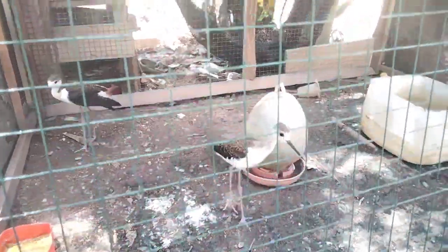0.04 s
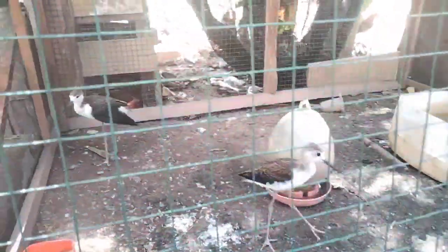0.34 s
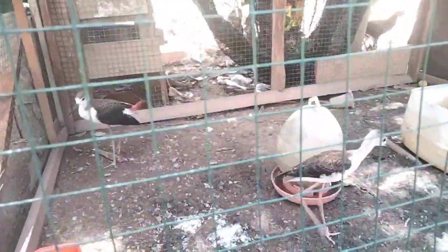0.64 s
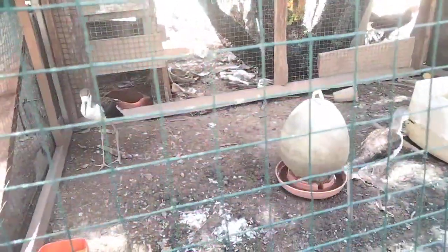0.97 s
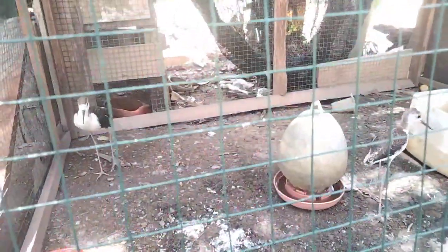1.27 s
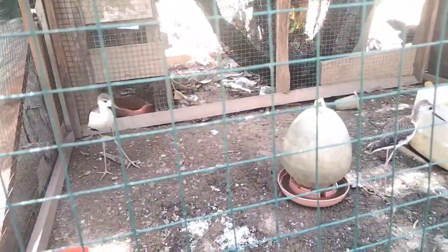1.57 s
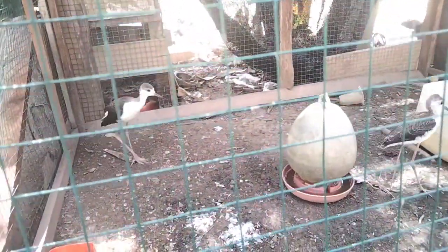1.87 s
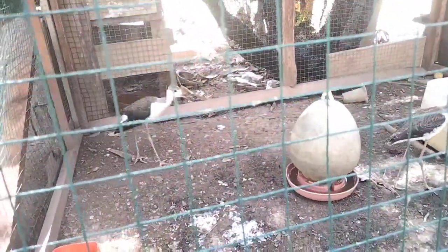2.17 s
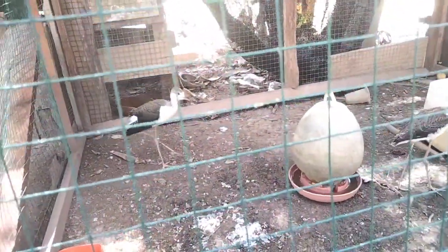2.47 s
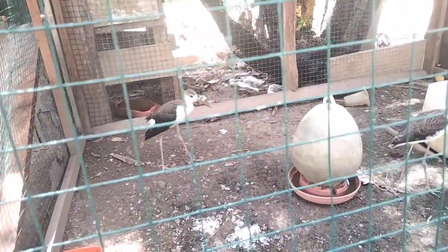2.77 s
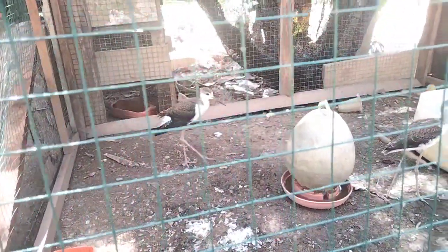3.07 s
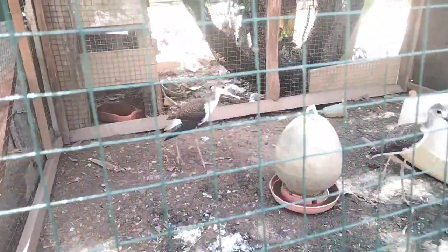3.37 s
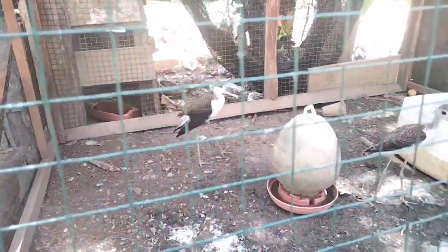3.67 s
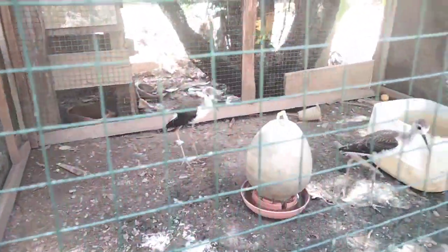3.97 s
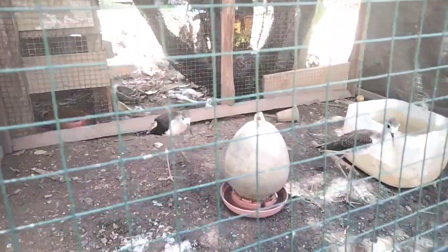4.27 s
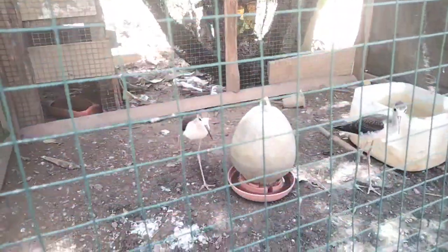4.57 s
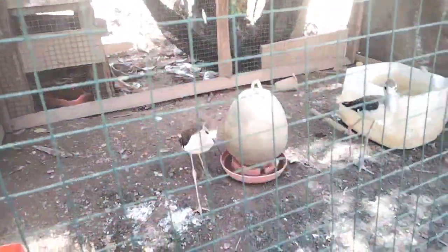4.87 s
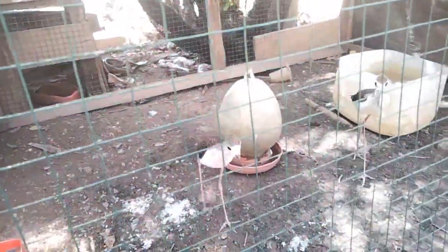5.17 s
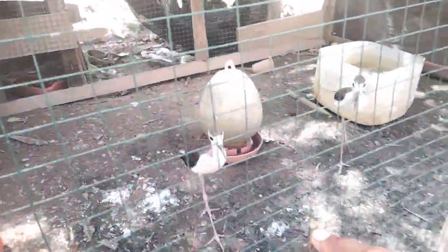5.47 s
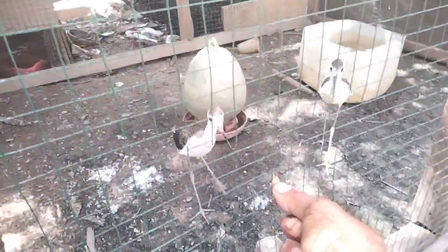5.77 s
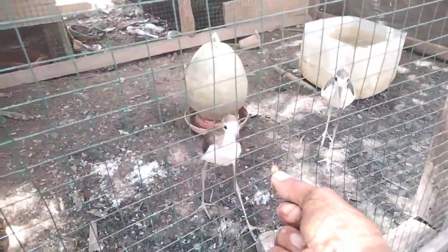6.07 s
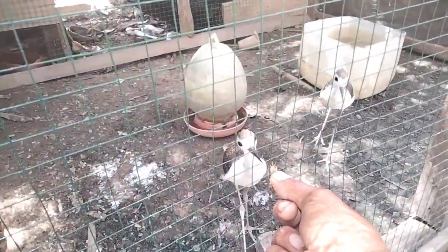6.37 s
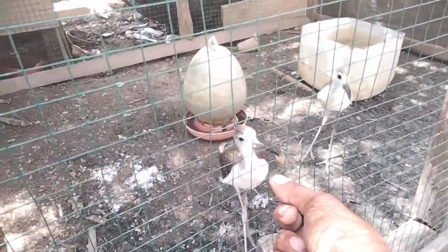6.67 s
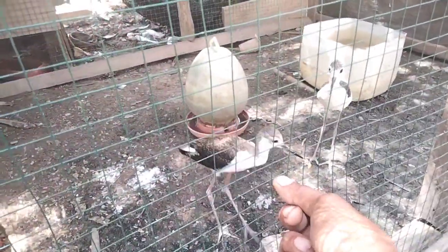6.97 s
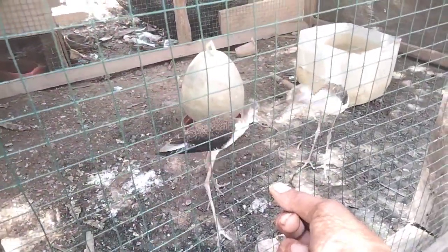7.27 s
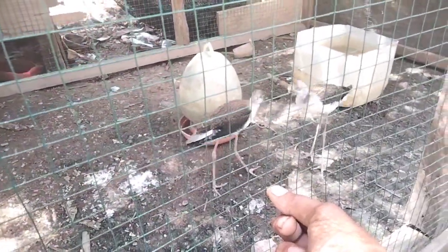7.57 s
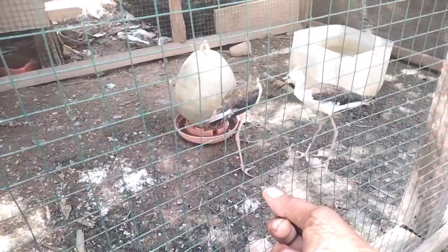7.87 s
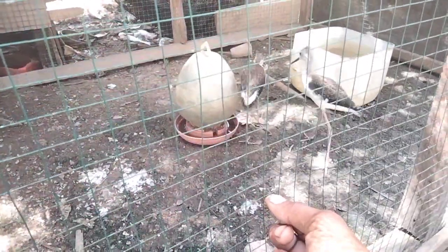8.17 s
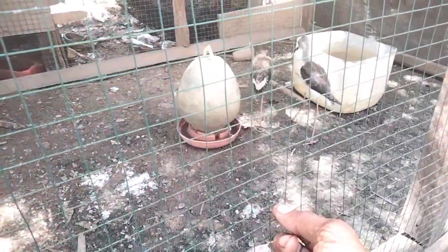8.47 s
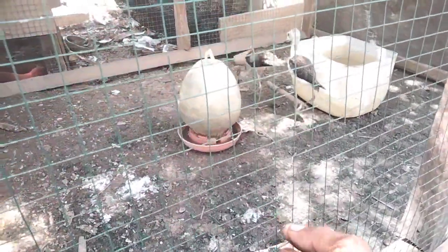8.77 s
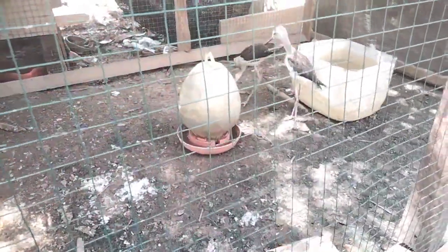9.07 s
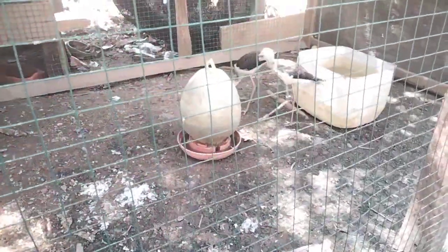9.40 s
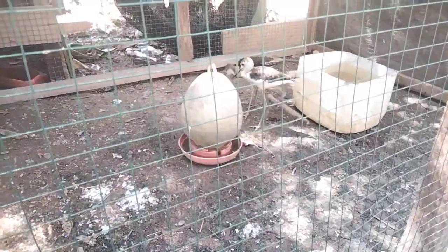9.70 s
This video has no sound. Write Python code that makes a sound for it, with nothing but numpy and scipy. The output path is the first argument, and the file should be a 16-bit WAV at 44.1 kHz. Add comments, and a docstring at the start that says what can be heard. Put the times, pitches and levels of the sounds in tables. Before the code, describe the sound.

Two wading birds squabble close by in an outdoor wire aviary. Their squawks are harsh and arching, each about a tenth of a second, coming singly or in quick clusters from the start until about 9.5 seconds, with a slight echo. From 0.3 to 2 seconds the cage frame is bumped repeatedly, giving dull ringing knocks and mesh clacks, with brief scuffs and a hand rustling on the microphone. Distant fowl give a faint wail near 1.3 seconds and clucks around 2.5. A loud, sharp peep cuts through at 4.8 seconds; softer peeps follow between 7.5 and 8.4. Small birds whistle faintly far away, mostly around 4 to 5.5 seconds. Wire and grit tick lightly, clearest near 2.7, 7.5 and after 9.2 seconds. Low wind rumble runs underneath, strongest at first, and a faint distant motor hum swells around 7 seconds.

```python
"""Two stilts (wading birds) squabble in a wire-mesh aviary, with harsh squawks and a few sharp peeps.
In each squawk, both sides of the bird's voice box (the syrinx) vibrate at once, at two arching pitches.
Farther off, fowl cluck and wail and small birds whistle. The bumped cage frame rings, mesh and grit
tick, and feet scuff. Beneath it all, wind and a hand brush the microphone and a distant motor hums."""
import sys
import numpy as np
from scipy import signal
from scipy.fft import rfft, irfft, next_fast_len
from scipy.io import wavfile
from scipy.ndimage import uniform_filter1d

SR = 44100
rng = np.random.default_rng(int(sys.argv[2]) if len(sys.argv) > 2 else 0)


def materialize(psi):
    """Save the field psi as 16-bit PCM at rate SR to the path in sys.argv[1].

    A 1-D psi becomes a single channel; in a 2-D psi each row is a channel.
    """
    bounded = np.clip(np.atleast_2d(psi).T, -1, 1)
    quanta = np.round(bounded * 32767).astype(np.int16)
    wavfile.write(sys.argv[1], SR, quanta)


N = 438354
TIME = np.arange(N) / SR
CUTOFF_HZ = 15800

# the bright tone of a tick of wire or grit: frequency_hz, gain_db
TICK_COLOUR = [(800, -16), (2500, -1.5), (5500, -5), (8800, 16), (12000, -3.5), (15000, 2)]


def from_db(db):
    """Turn decibels into a factor to multiply by."""
    return 10 ** (np.asarray(db) / 20)


def rms_one(x):
    """Scale a sound to an average strength (rms) of 1."""
    return x / np.sqrt(np.mean(x ** 2) + 1e-20)


def along(rows, where):
    """Look up a table by its first column, joining the rows with straight lines."""
    first, *columns = np.transpose(rows)
    return [np.interp(where, first, column) for column in columns]


def add(out, start_s, sound):
    """Mix a sound in at its start time."""
    i = int(round(start_s * SR))
    part = sound[max(-i, 0):max(N - i, 0)]
    out[max(i, 0):max(i, 0) + len(part)] += part


def coloured(x, colour):
    """Shape a sound's tone with rows of frequency_hz, gain_db."""
    size = next_fast_len(len(x) + 512)
    hz, db = np.transpose(colour)
    bins_hz = np.arange(size // 2 + 1) * SR / size
    gain = from_db(np.interp(np.log(bins_hz + 1), np.log(hz), db))
    return irfft(rfft(x, size) * gain, size)[:len(x)]


def wander(n, per_s):
    """Random motion with spread 1 and per_s new values a second."""
    steps = np.arange(n) * per_s / SR
    values = rng.standard_normal(n // 16 + 2)
    return np.interp(steps, np.arange(len(values)), values) * np.sqrt(3 / 2)


def noise(n, colour):
    """Steady noise of a given tone, at strength 1."""
    return rms_one(coloured(rng.standard_normal(n), colour))


def unsteady_noise(db, colour, uneven_db, per_s):
    """Noise whose level drifts at random around db."""
    return from_db(db + uneven_db * wander(N, per_s)) * noise(N, colour)


def burst(colour, fade_s):
    """A crack of noise that dies away by 60 dB in fade_s."""
    t = np.arange(SR // 5) / SR
    return noise(len(t), colour) * from_db(-60 * t / fade_s) / 2


def note(pitch_hz, overtones_db, waver):
    """A nearly pure, slightly shaky note that follows a pitch curve."""
    phase = 2 * np.pi * np.cumsum(pitch_hz * (1 + waver * wander(len(pitch_hz), 400))) / SR
    overtones = sum(from_db(db) * np.sin(k * phase) for k, db in enumerate(overtones_db, start=2))
    return np.sqrt(2) * (np.sin(phase) + overtones)


def yard_echo(x, db, fade_s=0.37):
    """The surroundings add a thin, smooth tail of echo."""
    t = np.arange(SR) / SR
    wash = coloured(rng.standard_normal(SR), [(300, 1.0), (3500, -5.5), (7000, -5.0), (15000, -5.5)])
    tail = wash * (1 - np.exp(-t / 0.0055)) * from_db(-60 * t / fade_s)
    return x[:N] + from_db(db) * signal.fftconvolve(x, tail / np.linalg.norm(tail))[:N]


def cage_echo(x, db, fade_s=0.16, echoes_per_s=900):
    """Scattered echoes bounce off the ground and the boards of the cage."""
    t = np.arange(SR // 8) / SR
    echoes = rng.standard_normal(len(t)) * (rng.random(len(t)) < echoes_per_s / SR)
    echoes *= (t > .002) * from_db(-60 * t / fade_s)
    direct = t == 0
    return signal.fftconvolve(x, direct + from_db(db) * echoes / np.linalg.norm(echoes))


def motor(waver=0.03985, throb_db=3, trim_db=-0.5):
    """The firing of a far engine makes a low, wavering hum."""
    # the hum over time: time_s, pitch_hz, level_db
    hum = [(3.0, 91.8, -68), (6.3, 91.7, -73.5), (6.55, 107.5, -58), (6.8, 102.8, -52.5),
           (6.95, 103.5, -66), (7.7, 92.2, -58.5), (9.94, 88, -79)]
    hz, db = along(hum, TIME)
    gain = np.sqrt(2) * from_db(db + trim_db + throb_db * wander(N, 13))
    pitch_hz = hz * (1 + waver * wander(N, 30))
    return gain * np.sin(2 * np.pi * np.cumsum(pitch_hz) / SR)


def wind(trim_db=2):
    """Wind on the microphone makes a deep rumble."""
    # the rumble over time: time_s, level_db
    levels = [(0, -53.5), (1.3, -56.5), (2.8, -60.5), (5, -62.5), (6.5, -62), (9.94, -62)]
    # its deep tone: frequency_hz, gain_db
    colour = [(15, 1), (75, -4.5), (130, -10), (250, -23.5), (600, -66.5)]
    return unsteady_noise(along(levels, TIME)[0] + trim_db, colour, uneven_db=4, per_s=4.4)


def hand_grip():
    """A hand gripping the microphone makes a dull noise."""
    # the grip's noise over time: time_s, level_db
    levels = [(0.0, -57), (0.66, -50), (3.26, -63.5), (8.75, -66), (9.05, -60), (9.94, -66)]
    # its dull tone: frequency_hz, gain_db
    colour = [(130, 3.5), (230, 3), (400, -5), (700, -8), (1500, -9.5), (3000, -30), (6000, -25.5)]
    return unsteady_noise(along(levels, TIME)[0], colour, uneven_db=3, per_s=49)


def hand_rustle(floor_db=-65.5, rise_s=0.059, sag_db=3.5, release_s=0.19):
    """Each slide of the hand starts quickly, eases off and stops, over a faint, lasting hiss."""
    # slides over the microphone: start_s, length_s, level_db
    slides = [(0.345, 1, -50.5), (1.426, 0.15, -53.5), (1.82, 0.4, -46), (9.468, 0.15, -50.5)]
    # the tone of the hiss: frequency_hz, gain_db
    colour = [(300, -8), (1500, -5), (3300, -1.5), (4800, -9.5), (6300, -9.5), (8700, 3), (12500, -11.5),
              (15000, -5.5)]
    power = from_db(floor_db) ** 2
    for start_s, length_s, db in slides:
        t = TIME - start_s
        shape = np.clip(t / rise_s, 0, 1) * np.exp(-np.maximum(t - length_s, 0) / release_s)
        power += (shape * from_db(db - sag_db * np.clip(t / length_s, 0, 1))) ** 2
    return unsteady_noise(10 * np.log10(power), colour, uneven_db=2.5, per_s=58)


def whistles():
    """Far songbirds whistle thin notes that bend smoothly in pitch."""
    # the notes: start_s, length_s, start_hz, middle_hz, end_hz, level_db
    notes = [(0.851, 0.13, 3200, 3120, 3150, -61), (4.3, 0.12, 6950, 6460, 5500, -60),
             (5.254, .07, 3630, 5200, 5150, -58.5), (5.304, 0.15, 3200, 5150, 5750, -60),
             (9.719, 0.084, 2800, 3000, 2900, -62)]
    out = np.zeros(N)
    for start_s, length_s, *pitches, db in notes:
        progress = np.linspace(0, 1, int(length_s * SR))
        pitch_hz = np.polyval(np.polyfit([0, .5, 1], pitches, 2), progress)
        tone = note(pitch_hz, overtones_db=[], waver=0.013)
        add(out, start_s, from_db(db) * tone * np.sin(np.pi * progress))
    return out


def fowl(jitter=0.03, harmonics=7):
    """A membrane in the throat snaps once a cycle, making short clucks and long sinking wails."""
    # clucks and wails: start_s, length_s, start_hz, end_hz, level_db
    calls = [(0.916, 0.02, 390, 403, -45), (1.288, 0.36, 961, 869, -61), (2.487, 0.014, 427, 371, -52),
             (2.568, 0.025, 450, 363, -54), (2.647, 0.028, 439, 350, -54.5), (2.733, 0.037, 415, 365, -52),
             (5.559, .42, 1012, 890, -75.5), (6.329, 0.27, 822, 736, -71), (6.657, 0.2, 633, 500, -58),
             (7.209, 0.036, 462, 528, -58.5)]
    # the tone of a fowl's throat: frequency_hz, gain_db
    throat = [(250, 15), (560, -6), (850, -7), (1650, -9), (2400, -10), (4000, -55.5)]
    out = np.zeros(N)
    for start_s, length_s, start_hz, end_hz, db in calls:
        progress = np.linspace(0, 1, int(length_s * SR))
        pitch_hz = (start_hz + (end_hz - start_hz) * progress) * (1 + jitter * wander(len(progress), 209.6))
        phase = 2 * np.pi * (np.cumsum(pitch_hz) / SR + rng.random())
        buzz = sum(np.cos(k * phase) for k in range(1, harmonics + 1))
        swell = np.sqrt(np.abs(np.sin(np.pi * progress)))
        add(out, start_s, from_db(db) * rms_one(coloured(buzz, throat)) * swell)
    return out


def scuffs(grain_db=3):
    """Feet scuff the dirt and the mesh scrapes: grainy noise that starts quickly and fades."""
    # the scrapes: start_s, length_s, level_db
    scrapes = [(0.55, .07, -46), (0.735, 0.083, -49.5), (5.136, 0.19, -56), (6.308, 0.03, -54.5)]
    # their tone: frequency_hz, gain_db
    colour = [(250, -7), (1200, 3), (5500, -10.5), (9000, -2), (15000, -18)]
    out = np.zeros(N)
    for start_s, length_s, db in scrapes:
        n = int(length_s * SR)
        progress = np.linspace(0, 1, n)
        scrape = noise(n, colour) * from_db(db + grain_db * wander(n, 305))
        add(out, start_s, scrape * np.minimum(10 * progress, 1) * (1 - progress))
    return out


def ticks(grit_per_s=4.8, grit_db=-46, spread_db=2.5, trim_db=1):
    """Wire and grit tick: a few clear contacts, and faint random ones under the birds' feet."""
    # the clearest ticks: start_s, level_db
    clear = [(2.681, -34), (7.544, -30.5), (9.254, -31.5), (9.752, -35), (9.83, -39)]
    out = np.zeros(N)
    count = int(grit_per_s * N / SR)
    faint = [(rng.uniform(0, N / SR), rng.normal(grit_db, spread_db)) for _ in range(count)]
    for start_s, db in clear + faint:
        add(out, start_s, from_db(db + trim_db) * burst(TICK_COLOUR, fade_s=0.019))
    return out


def bumps(ring_gain_db=-8, clack_gain_db=13, wire_gain_db=2, rattle_s=0.03, rattle_loss_db=14):
    """Each bump sets the cage frame ringing; the mesh clacks against it, then falls back more softly."""
    # bumps on the frame: start_s, thud_db, clack_db
    hits = [(0.342, -23.5, -45), (0.400, -26.5, -36.5), (0.45, -52, -39.5), (0.483, -26.5, -43),
            (0.52, -54, -47.5), (0.618, -56, -37), (0.647, -28.5, -32.5), (0.756, -37, -42),
            (1.033, -27.5, -42.5), (1.047, -25, -40), (1.489, -34.5, -55), (1.772, -28.5, -37.5),
            (1.965, -39.5, -46.5), (3.241, -44, -60)]
    # the notes the frame rings at: pitch_hz, level_db, fade_s (time to drop 60 dB)
    frame = [(227.6, 5, 0.11), (252.6, -0.5, 0.14), (313, 5, 0.051), (390, -11, 0.085)]
    # the tone of the clack: frequency_hz, gain_db
    clack_colour = [(400, -7.5), (750, 6.5), (1150, -0.5), (1650, 1), (2400, -1), (5000, -13.5), (9000, -9),
                    (15000, -22)]
    out, t = np.zeros(N), np.arange(SR // 4) / SR
    for start_s, thud_db, clack_db in hits:
        ring = sum(from_db(db + rng.normal() - 60 * t / fade_s) * np.sin(2 * np.pi * hz * t)
                   for hz, db, fade_s in frame)
        add(out, start_s, from_db(thud_db + ring_gain_db) * ring * (1 - np.exp(-t / 0.0027)))
        for delay_s, loss_db in [(0, 0), (rattle_s * rng.uniform(.8, 1.2), rattle_loss_db)]:
            clack = from_db(clack_gain_db) * burst(clack_colour, fade_s=0.028)
            wire = from_db(wire_gain_db) * burst(TICK_COLOUR, fade_s=0.017)
            add(out, start_s + delay_s, from_db(clack_db - loss_db) * (clack + wire))
    return out


def peeps(full_voice_db=-30, lead_share=0.37, scoop_share=0.27, drop_share=0.22, lead_in_db=-15):
    """A stilt's loud peep leaps to its top pitch, a soft one starts there; both sag, then break off."""
    # the peeps: start_s, length_s, top_hz, sag_share (of the pitch), level_db
    calls = [(2.656, 0.024, 3160, 0.35, -48.5), (4.797, 0.048, 3790, 0.05, -19.5),
             (5.047, .026, 3460, 0.18, -41.5), (7.467, 0.031, 4930, 0.37, -43),
             (7.873, .025, 4000, 0.26, -45), (8.143, 0.0164, 3660, 0.212, -44.5),
             (8.183, 0.031, 4380, 0.3, -39.5), (8.403, 0.018, 4650, 0.44, -48)]
    out = np.zeros(N)
    for start_s, length_s, top_hz, sag, db in calls:
        progress = np.linspace(0, 1, int(length_s * SR))
        lead = lead_share * (db > full_voice_db)
        low = np.clip(10 * (lead - progress), 0, 1)
        falling = np.maximum(progress - lead, 0) / (1 - lead)
        pitch_hz = top_hz * (1 - scoop_share * low - sag * falling ** .6 - drop_share * falling ** 6)
        flutter_db = 14 * sag * wander(len(progress), 1400)   # more sag, hoarser peep
        gain = np.sin(np.pi * progress ** 1.15) * from_db(db + lead_in_db * low + flutter_db)
        add(out, start_s, gain * note(pitch_hz, overtones_db=[-12, -28, -33], waver=0.14 * sag))
    return out


def effort_db(progress, attack_share=0.48, attack_db=14.5, release_share=0.33, release_db=5.5):
    """The push behind a squawk swells, holds and lets go."""
    swelling = np.maximum(1 - progress / attack_share, 0)
    letting_go = np.maximum(1 - (1 - progress) / release_share, 0)
    return -attack_db * swelling - release_db * letting_go ** 2


def syrinx(low_hz, high_hz, harsh, gain_db, jitter=0.0222, breath=0.92, uneven_db=3.5, sum_tone_db=0.13):
    """Two linked membranes give two pitches, their overtones and their sums; harshness frays them all."""
    # each tone is so many times the low pitch plus so many times the high one
    mixes = np.array([(k - j, j) for k in range(1, 10) for j in range(k + 1)])
    shaky_hz = np.array([hz * (1 + jitter * harsh * wander(len(hz), 499.3)) for hz in (low_hz, high_hz)])
    hz = mixes @ np.array([low_hz, high_hz])
    phase = mixes @ (2 * np.pi * np.cumsum(shaky_hz, axis=1) / SR)
    phase += rng.uniform(0, 2 * np.pi, (len(mixes), 1))
    fray = breath * harsh * wander(2 * hz.size, 800).reshape(2, *hz.shape)
    tones = (1 + fray[0]) * np.cos(phase) + fray[1] * np.sin(phase)
    drift_db = uneven_db * wander(hz.size, 34.88).reshape(hz.shape)
    first_sum = (mixes == 1).all(axis=1, keepdims=True)
    gains = from_db(gain_db(hz) + drift_db + sum_tone_db * first_sum) * (hz < CUTOFF_HZ)
    voice = (gains * tones).sum(0)
    return voice / np.sqrt(uniform_filter1d(voice ** 2, size=900))   # even out the loudness


def squawks(beak_width_hz=400, beak_shut_share=0.27, dull_start_db=9, flutter_db=1.45, trim_db=-1):
    """A stilt's two pitches climb one arch; the bigger the climb, the hoarser and the sooner it rasps."""
    # the squawks: start_s, length_s, low_top_hz, high_top_hz, climb_share (of the pitch),
    # crest_share (of the length; above 1 it ends still rising), level_db, beak_hz
    calls = [(-.085,.11,1666,2320,0.33,0.69,-28.5,3600), (0.129,.095,1752,2600,0.36,0.76,-24.5,3440),
             (1.018,0.099,1708,2470,0.22,0.95,-26.5,3280), (1.109,0.096,1780,2730,0.43,0.82,-23,3310),
             (1.149,0.095,1652,2289,0.18,0.62,-22.5,3450), (1.77,0.11,1638,2240,0.16,0.59,-28.5,3660),
             (2.108,0.12,1540,2138,0.39,1.22,-27,3530), (2.165,.12,1481,2226,0.42,1.03,-30.5,3270),
             (2.773,.11,1691,2587,0.42,0.94,-32,3540), (3.061,.11,1534,2312,0.43,0.99,-30.5,3970),
             (3.13,0.13,1653,2414,0.25,0.8,-37.5,3440), (3.477,0.17,1560,2214,0.27,0.67,-28,3700),
             (3.644,0.11,1593,2423,0.36,0.98,-27.5,3530), (3.761,0.1,1523,2148,0.31,0.91,-24.5,3650),
             (4.018,.11,1500,2192,0.35,0.88,-27.5,3720), (4.168,.12,1661,2405,0.31,1.4,-32,3730),
             (4.654,.11,1916,2837,0.5,0.86,-31.5,3370), (5.458,0.11,1594,2260,0.18,0.53,-29.5,4200),
             (5.894,.11,1843,2820,.45,.82,-32.5,3240), (6.518,0.11,1607,2200,0.2,0.66,-28.5,3660),
             (6.641,0.088,1650,2371,0.14,1.1,-34.5,3320), (6.991,0.11,1885,2850,0.47,0.91,-32.5,3400),
             (7.573,0.13,1603,2273,0.28,0.57,-32,3510), (7.943,0.13,1509,2082,0.34,0.78,-28.5,3370),
             (8.764,0.12,1596,2226,0.28,0.59,-29,3730), (8.991,0.12,1853,2745,0.43,0.76,-31,3420),
             (9.086,0.096,1738,2488,0.3,1.18,-26.5,3460), (9.355,.12,1640,2354,0.4,1.4,-30.5,3800)]
    # the squawk's tone, from the bird's throat plus the microphone's bright peak near 8.8 kHz:
    # frequency_hz, gain_db
    colour = [(600, -30), (1000, -7.5), (1450, -9.5), (2200, -4), (3650, 2), (5600, -10), (7200, -2.5),
              (8800, 10), (12500, -4.5), (15000, 1.5)]
    # the treble as the birds turn towards the microphone and away: time_s, gain_db
    facing = [(0.15, -2.5), (1.1, -2), (3.7, 1.5), (5.5, -4), (6.55, -1), (6.95, 0), (8.8, -0.5), (9.1, 1)]
    # how hoarse a climb makes the voice: climb_share, hoarseness (0 to 1)
    hoarseness = [(.2, .38), (.44, .64)]
    out = np.zeros(N)
    for start_s, length_s, low_hz, high_hz, climb, crest, db, beak_hz in calls:
        progress = np.linspace(0, 1, int(length_s * SR))
        arch = 1 - climb * (1 - progress / crest) ** 2
        hoarse = along(hoarseness, climb)[0]
        harsh = hoarse + 1.3 * np.clip((progress - 1 + .6 * hoarse) / .24, 0, 1)
        closed = np.maximum(1 - progress / .72, 0)
        ring_hz = beak_hz * (1 - beak_shut_share * closed ** 2)
        treble_db = along(facing, start_s)[0] - dull_start_db * closed

        def gain_db(hz):
            """The squawk's tone; as the beak opens, it rings higher and lets out more treble."""
            beak_db = -10 * np.log10(1 + ((hz - ring_hz) / beak_width_hz) ** 2)
            return along(colour, hz)[0] + beak_db + treble_db * np.clip(hz / 4200 - 1, 0, 1)

        voice = syrinx(low_hz * arch, high_hz * arch, harsh, gain_db) * np.minimum(progress / 0.18, 1)
        shake_db = flutter_db * np.minimum(harsh, 1) * wander(len(progress), 220)
        call = voice * from_db(db + trim_db + effort_db(progress) + shake_db)
        add(out, start_s, cage_echo(call, db=-7))   # the birds walk, so each call has its own echoes
    return out


def scene():
    """The stilts and the cage close by, other birds farther off, wind, hand and motor beneath."""
    stilts = yard_echo(squawks(), db=-10)
    stilts += yard_echo(cage_echo(peeps(), db=-15), db=-24.5)
    knocks = yard_echo(cage_echo(bumps() + ticks() + scuffs(), db=-8.5), db=-14.5)
    far_birds = from_db(0.5) * yard_echo(cage_echo(whistles() + fowl(), db=0), db=-18.5)
    return (stilts + knocks + far_birds + wind() + hand_grip() + hand_rustle() + motor())[None]


def record(dry, bias=-0.065, settle_s=0.52):
    """The highest treble is cut; the microphone's bias (an offset from zero) settles after switch-on."""
    treble_cut = signal.ellip(10, .05, 60, CUTOFF_HZ, fs=SR, output="sos")
    return signal.sosfiltfilt(treble_cut, dry) + bias * np.exp(-TIME / settle_s)


dry = scene()
out = record(dry)
materialize(out)
```